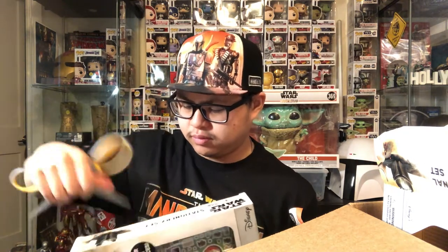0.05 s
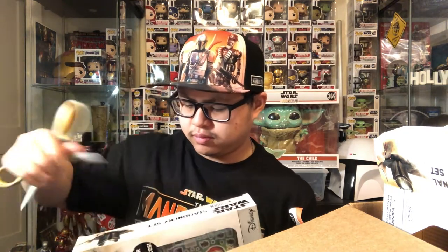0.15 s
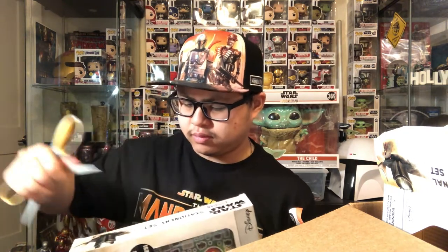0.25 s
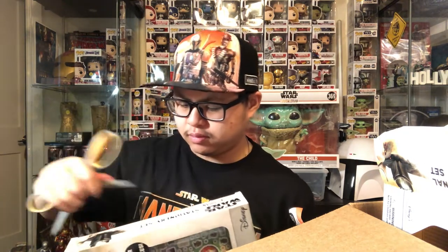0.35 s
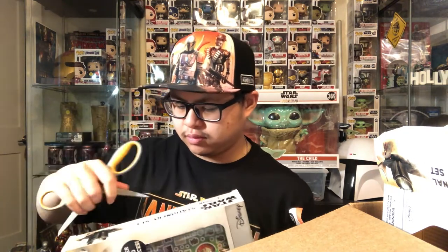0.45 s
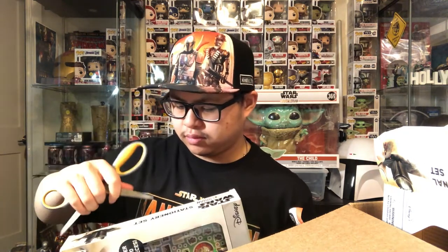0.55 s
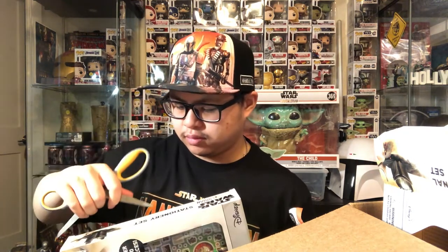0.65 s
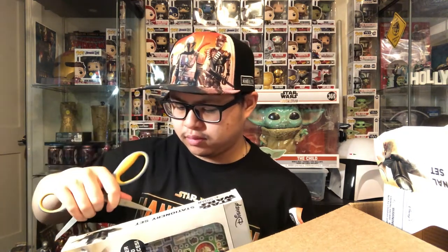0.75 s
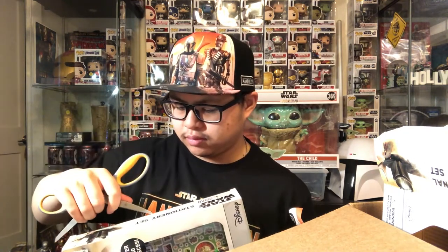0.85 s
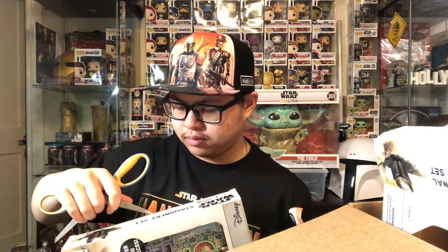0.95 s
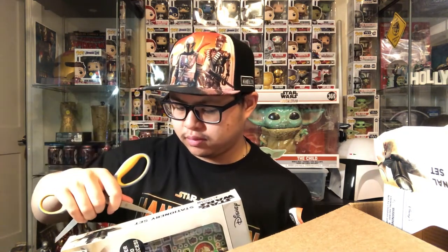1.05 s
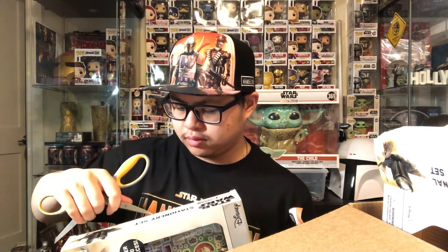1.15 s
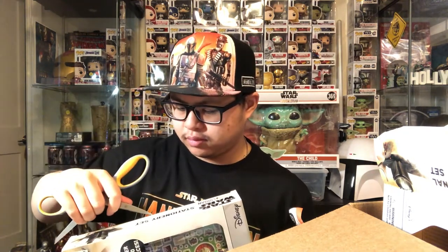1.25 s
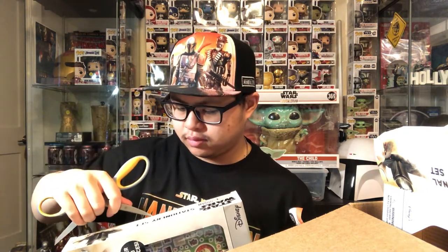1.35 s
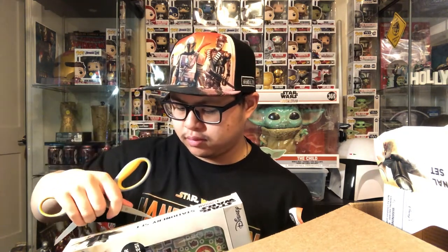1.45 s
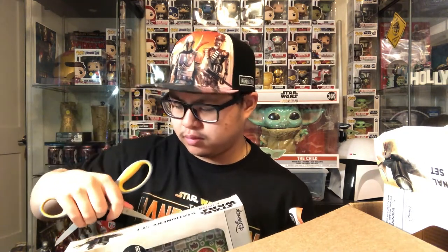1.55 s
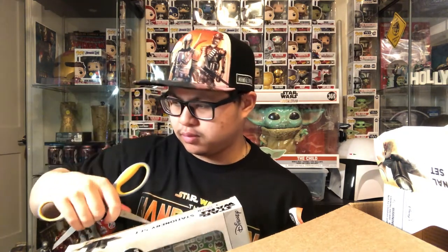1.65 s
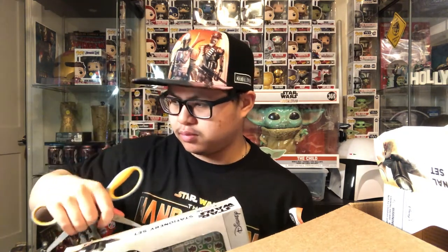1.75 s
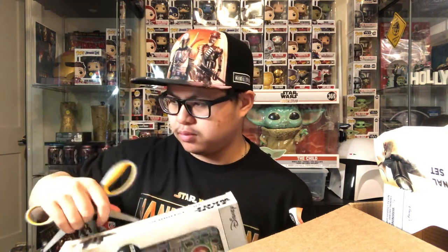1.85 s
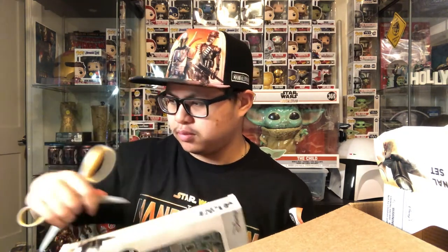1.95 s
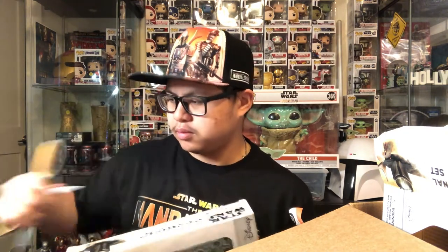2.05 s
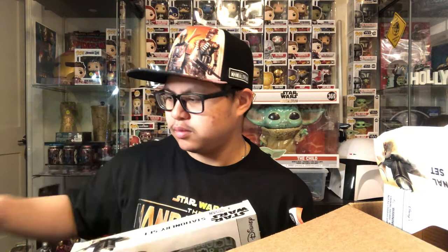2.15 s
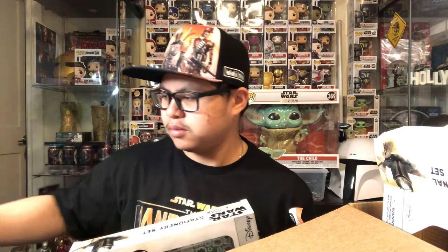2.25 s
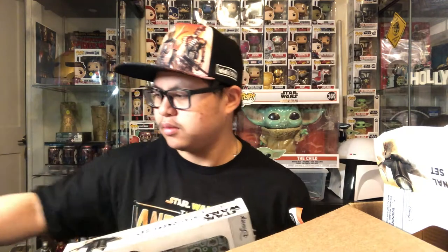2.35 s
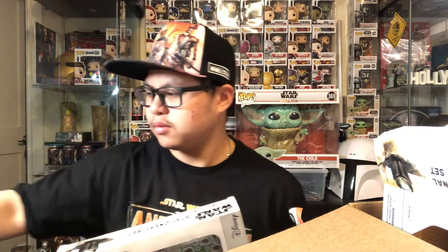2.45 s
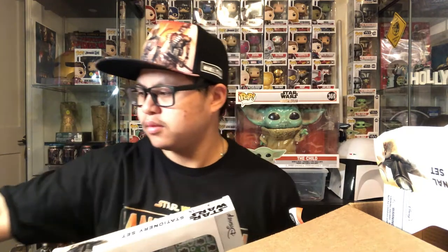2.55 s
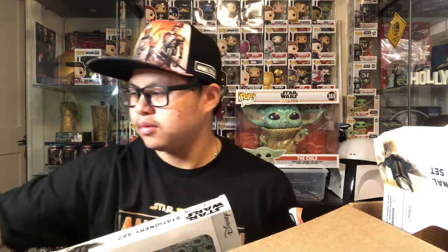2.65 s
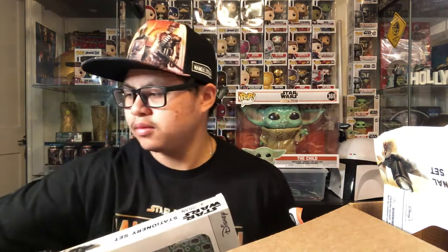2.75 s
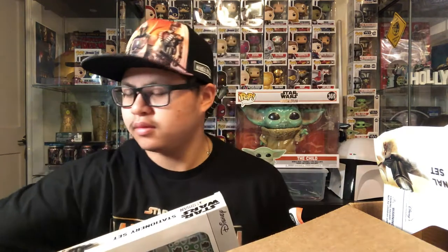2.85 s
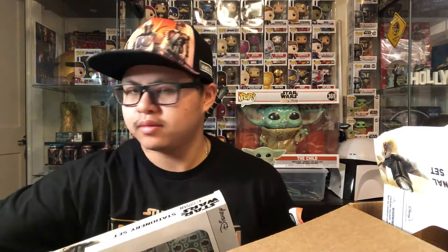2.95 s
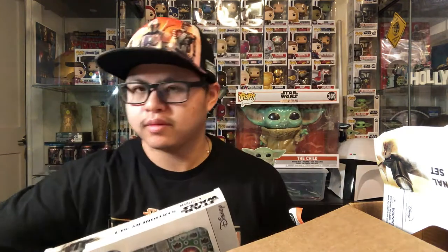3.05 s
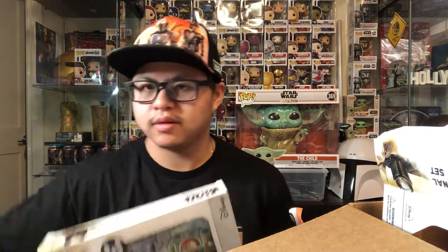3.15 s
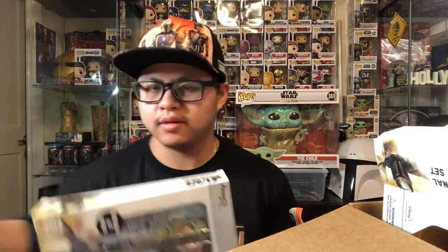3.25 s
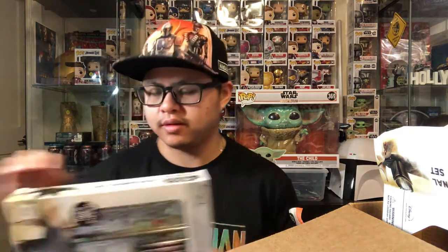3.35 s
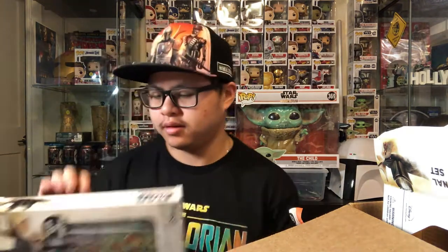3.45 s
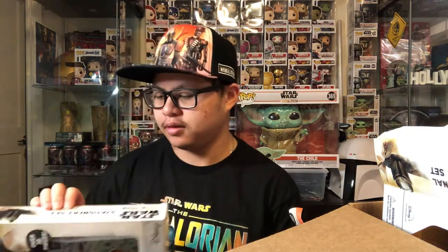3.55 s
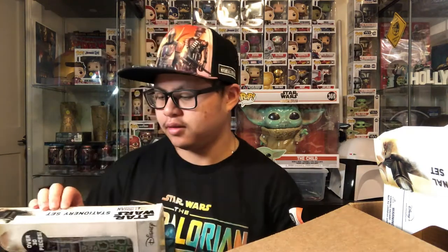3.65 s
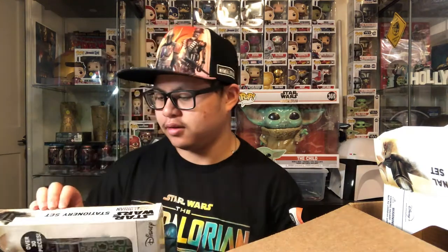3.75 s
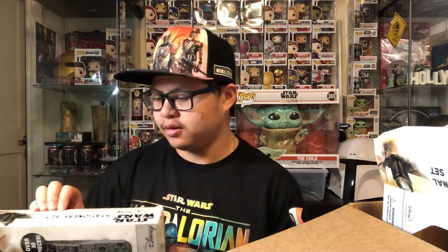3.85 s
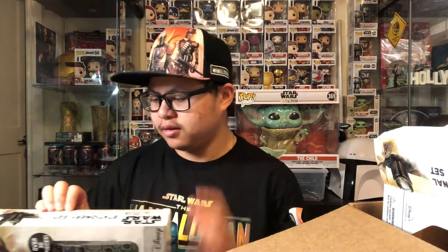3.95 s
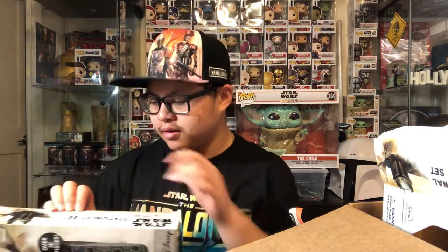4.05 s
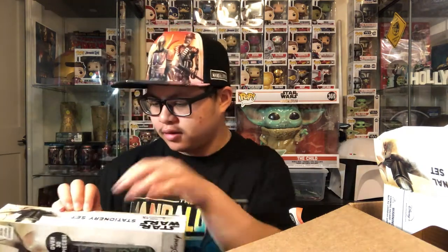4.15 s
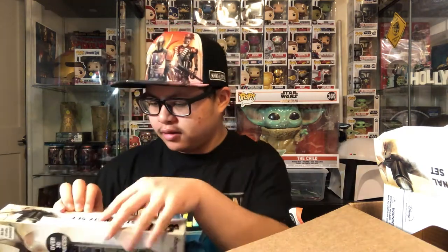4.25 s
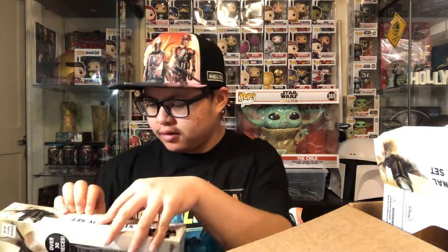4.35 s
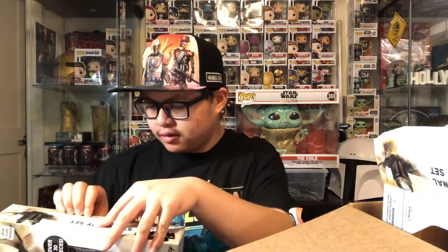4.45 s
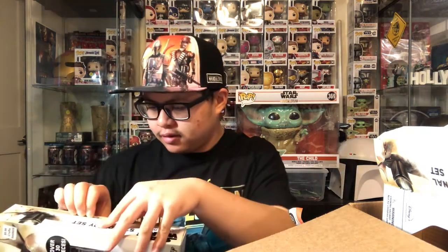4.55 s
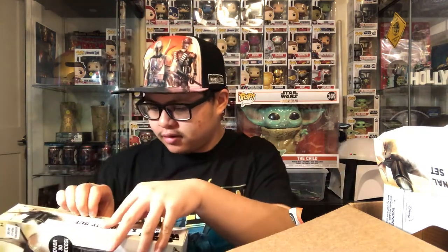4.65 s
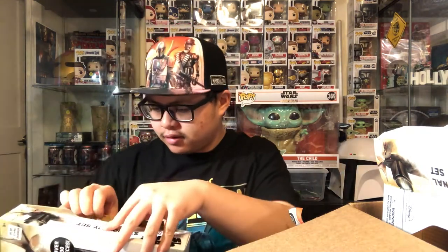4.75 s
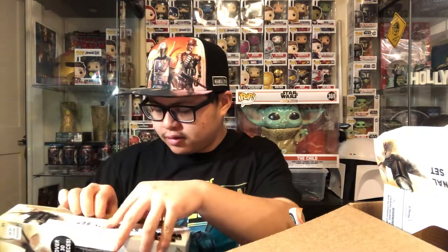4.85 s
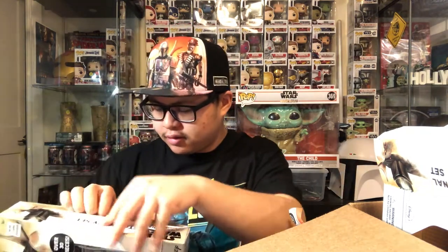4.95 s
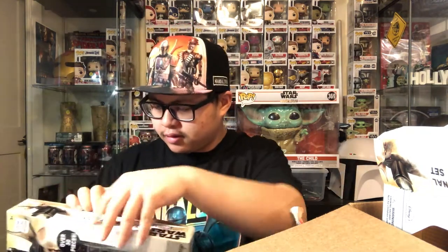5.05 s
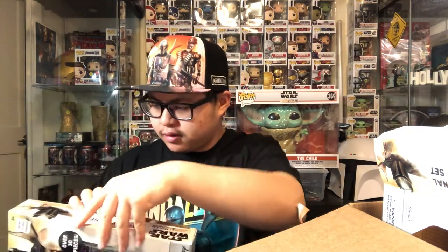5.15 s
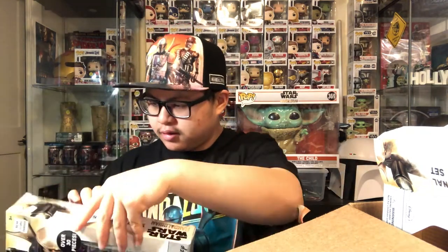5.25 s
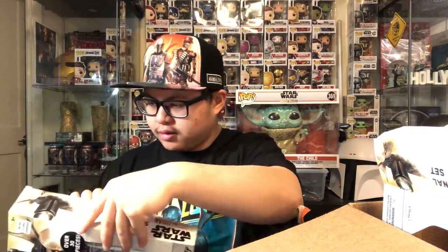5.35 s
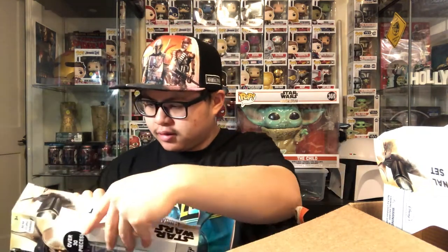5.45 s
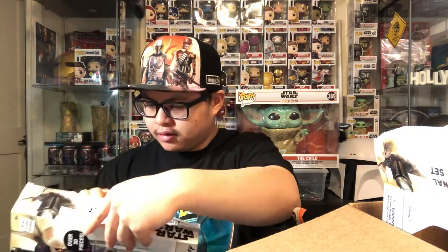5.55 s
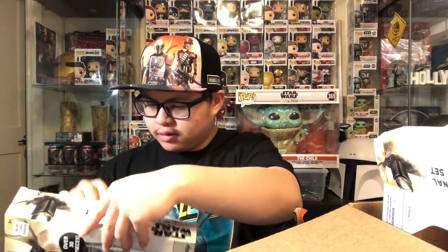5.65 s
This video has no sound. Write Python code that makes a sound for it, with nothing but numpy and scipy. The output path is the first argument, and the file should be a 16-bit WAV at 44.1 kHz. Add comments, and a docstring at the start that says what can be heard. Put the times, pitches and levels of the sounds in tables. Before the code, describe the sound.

Faint rustling and small clicks lead to two scissor snips through a box's seal, the second sharper, with a slight metallic ring. After a pause the scissors land on a desk and bounce. Fingers tap and slide on the hollow cardboard, a plastic panel pops, and a flap springs open with a loud snap, followed by dry scraping. Everything is close, with short echoes from a small, quiet room.

```python
"""A cardboard box with a plastic window, opened close to the microphone at a desk in a small, crowded room.
Scissors pick at the seal and cut it, their steel ringing thinly, then clatter down on the desk.
Hands turn the hollow box, knocking and rubbing; the window pops, a flap snaps open with a puff of air,
and card scrapes on card as its fibres catch and slip. Behind it, short echoes off shelves and room tone."""
import sys
import numpy as np
from scipy import signal
from scipy.fft import rfft, irfft
from scipy.io import wavfile

SR = 44100
rng = np.random.default_rng(int(sys.argv[2]) if len(sys.argv) > 2 else 0)


def pcm_store(signal):
    """Save signal as 16-bit PCM."""
    levels = np.round(np.clip(np.atleast_2d(signal), -1, 1) * 32767)
    wavfile.write(sys.argv[1], SR, levels.astype(np.int16).T)


N = 251370

# fingers knock on the box and snap the flap open: t/s, level/dB, brightness/(dB per octave)
BOX_KNOCKS = [(2.1765, -65, 1.8), (3.5968, -43.5, 2.5), (3.658, -54, -1.5), (3.7275, -50, 1.5),
              (3.7525, -47, 4), (3.7715, -41, -3.5), (3.8188, -49.5, 2.6), (3.922, -69, -8),
              (3.9955, -63, 1.5), (4.0485, -63, -8), (4.2288, -49, 6.5), (4.2322, -36.5, 0.7),
              (4.244, -44.5, -4.5), (4.409, -55, 0), (4.429, -62, -3.5), (4.469, -58, -3.5),
              (4.526, -56.5, -3), (4.626, -55.5, -2.5), (4.6942, -39, 5.6), (4.6952, -18, 3.5),
              (4.698, -20, -2.5), (4.935, -48, -2), (4.9607, -49.5, 5), (5.237, -51.5, 3.5),
              (5.3368, -42, 4.5), (5.5574, -54, -3.5)]
# modes of the hollow box: f/Hz, level/dB, t60/s
BOX_MODES = [(171, -11.5, 0.051), (298, -9, 0.068), (397, -11.5, 0.038), (531, -4, 0.021), (630, 5, 0.023),
             (781, -7.5, 0.043), (962, -2, 0.028), (1104, -14.5, 0.011), (1576, 8, 0.006),
             (1942, -1, 0.013), (2710, 0.5, 0.0064), (3625, 3, 0.0065), (5160, -1, 0.0022),
             (11000, -23, 0.0029)]
# the plastic window pops as the box is set down: t/s, f/Hz, level/dB, t60/s
WINDOW_POP = (3.5968, 3330, -27, .011)
# air leaving the box: t/s, f/Hz, level/dB, t60/s
PUFFS = [(1.728, 81.8, -53.5, 0.17), (4.7, 69, -40.5, 0.14)]
# scissors at the seal: t/s, level/dB, brightness/(dB per octave)
SEAL_CUTS = [(0.871, -53.5, -3), (1.4355, -53, 0.5), (1.453, -51.5, 4), (1.471, -50, -5),
             (1.4832, -46, 2.5), (1.56, -54, 1), (1.5743, -40, 0.9), (1.697, -44, -3.5), (1.7208, -28, 4.5),
             (1.728, -27, -3), (1.7315, -35, -2), (1.7365, -42, -3.5), (1.847, -46.5, -4)]
# modes of the box's stiff edge: f/Hz, level/dB, t60/s
EDGE_MODES = [(408.6, -0.5, 0.02), (550, -0.5, 0.017), (880, 5.5, 0.012), (1023, -5, 0.024),
              (1178, 1, 0.018), (1500, -2, 0.015), (5500, -3, .008)]
# the blades close: t/s, level/dB
SNIPS = [(1.575, -13.5), (1.7212, -2.5)]
# modes of their steel: f/Hz, level/dB, t60/s
BLADE_MODES = [(960, -54, 0.74), (4100, -57, .2), (5230, -55.5, .25), (12400, -48, 0.11)]
# scissors land and bounce: t/s, level/dB, brightness/(dB per octave)
DESK_BOUNCES = [(2.814, -24, 0.4), (2.8328, -19, -1.9), (2.836, -24, -1.5), (2.8415, -33.5, 3.8),
                (2.847, -27, -0.4), (2.887, -34, -2), (2.927, -42.5, -3.5), (2.9777, -27.5, -2.5),
                (2.99, -32, -6.5), (3.0005, -34, 2.9)]
# modes of the scissors on the desk: f/Hz, level/dB, t60/s
DESK_MODES = [(192, -26.5, 0.016), (301, -10, 0.046), (424, -10, 0.021), (783, 1, 0.0083),
              (987, -0.5, 0.011), (1238, -9, 0.022), (1546, 2.5, 0.018), (2256, 3, 0.01),
              (2850, -9.5, 0.005), (3480, -2, 0.0086)]
# short hand strokes: firmest contact t/s, length/s, level/dB, brightness/(dB per octave)
STROKES = [(0.019, 0.08, -63.5, -1.5), (0.135, 0.078, -65.5, -1), (0.286, 0.022, -63.5, -3),
           (1.375, 0.074, -70, -2), (1.465, 0.077, -58.5, -3.5), (1.86, 0.023, -46, -2.5),
           (2.001, 0.055, -61.5, -1), (2.628, 0.46, -70, 0.9), (3.144, 0.022, -57, 2.5),
           (3.165, 0.072, -46, 0), (3.74, 0.18, -57.5, -.5), (3.78, 0.12, -52.5, -2),
           (4.093, 0.031, -58, 0), (4.19, 0.33, -66.5, 1.5), (4.327, 0.094, -54, -1),
           (4.425, 0.058, -59, -3), (4.846, .03, -44, 2.9), (4.949, 0.099, -50, -1),
           (5.55, 0.11, -52, -3.5), (5.666, .13, -54.5, -2.2)]
# two slides, the box turning and card dragging on card: t/s, level/dB, brightness/(dB per octave)
SLIDES = [
    [(3.26, -63, -1), (3.4, -60, 1.3), (3.475, -48, 0), (3.535, -55.5, 0.5), (3.575, -51.5, -2),
     (3.63, -97, -.5)],
    [(4.97, -66, -.3), (5.03, -52.5, -0.6), (5.15, -57, 0.1), (5.245, -41, -0.5), (5.28, -41, 4.5),
     (5.315, -42, -0.5), (5.355, -45.5, -4), (5.39, -56, -3.5), (5.48, -64, -3)],
]
# spectrum of rubbed card: f/Hz, level/dB
RUB_SPECTRUM = [(50, -7.5), (150, -4), (300, 0), (520, 6.5), (900, 1), (1400, 0), (2400, -6), (4000, -9),
                (5500, -8.5), (8500, -15), (15500, -19)]
# broad resonances of the panels: f/Hz, width/Hz, level/dB
PANEL_RESONANCES = [(280, 57.4, -11), (670, 84, -9.5), (860, 100, -17), (1920, 49, -9)]
# fingertips on the gloss: firmest contact t/s, length/s
GLIDE = (5.12, .17)
# resonances of their hiss: f/Hz, width/Hz, level/dB
GLIDE_RESONANCES = [(4500, 950, -59.5), (12100, 2700, -64)]
# four registers of blows and rubbing: low f/Hz, high f/Hz
REGISTERS = [(140, 550), (550, 1300), (1300, 4500), (4500, 16000)]
# the room's tail: f/Hz, level/dB, t60/s
ROOM_TAIL = [(150, -8.5, 0.39), (400, -5, 0.21), (977, -7, 0.23), (2500, -10, 0.28), (6860, -6, 0.26),
             (15000, -12, 0.051)]
# spectrum of the room tone: f/Hz, level/dB
ROOM_TONE = [(21, -33.5), (35, 0.5), (195, -6.5), (294, -10), (454, -8.5), (557, -17), (602, -10),
             (702, -13.5), (1140, -20), (5890, -26), (16000, -36.5)]

CONTACT_S, CONTACT_HALVING = 0.00045, 2.06   # a blow's rise time halves per 2.06 dB/octave of brightness
HOLLOW_PER_DB, MEDIUM_KNOCK_DB = 0.1746, -40   # harder blows bring out the hollow middle registers
SWELL_SHARE, STROKE_EDGE_DB, STROKE_ROUNDNESS = 0.38, 7.5, 1.48   # rising part, drop at the ends, curve
SLIDE_RELEASE_DB_PER_S, RUB_HOLLOW_DB = 500, 6.5


def box_knocks():
    """Fingers and the snapping flap strike the hollow box and ring its modes."""
    return blows(BOX_KNOCKS, BOX_MODES, crack_db=-4.0, crack_t60=0.033, crack_hz=11500,
                 spread_db=4.0, hollow_db=8.0)


def window_pop():
    """The plastic window pops once, a short high ring."""
    return ring(*WINDOW_POP)


def air_puffs():
    """The box pushes out a low thump of air as the seal gives and as the flap springs open."""
    return sum(ring(*puff) for puff in PUFFS)


def seal_cuts():
    """The blades pick and cut at the seal, ringing the box's stiff edge."""
    cuts = blows(SEAL_CUTS, EDGE_MODES, crack_db=1.0, crack_t60=0.034, crack_hz=15400,
                 spread_db=2.0, hollow_db=5.0, gain_db=-1.0)
    return high_pass(cuts, hz=260)


def blade_ring():
    """The steel rings on each time the blades close."""
    return sum(ring(s, hz, snip_db + mode_db, t60)
               for s, snip_db in SNIPS for hz, mode_db, t60 in BLADE_MODES)


def desk_clatter():
    """The scissors land and bounce, ringing together with the desk."""
    return blows(DESK_BOUNCES, DESK_MODES, crack_db=3.5, crack_t60=0.036, crack_hz=4300,
                 spread_db=1.0, hollow_db=11.5)


def blows(events, modes, crack_db, crack_t60, crack_hz, spread_db, hollow_db, gain_db=0.0):
    """Each blow rings the modes at random strengths, over a crack of crushed fibres and tiny contacts."""
    hz, mode_db, t60 = np.array(modes).T
    t = np.arange(SR // 8) / SR
    rings = np.sin(2 * np.pi * hz[:, None] * t) * from_db(-60 * t / t60[:, None])
    soften = signal.butter(2, crack_hz, fs=SR, output="sos")
    # crack_t60 holds at 1 kHz; higher registers die sooner
    register_t60 = crack_t60 * (1000 / np.mean(REGISTERS, axis=1, keepdims=True)) ** .4
    out = np.zeros(N + len(t))
    for s, blow_db, brightness in events:
        start = int(s * SR)
        middle_db = hollow_db + HOLLOW_PER_DB * (blow_db - MEDIUM_KNOCK_DB)
        strength, polarity = rng.standard_normal((2, len(REGISTERS), len(hz)))
        mode_gains = np.sign(polarity) * from_db(mode_db + spread_db * strength)
        crack = rng.standard_normal((len(REGISTERS), len(t))) * from_db(crack_db - 60 * t / register_t60)
        contact_s = CONTACT_S * 2 ** (-brightness / CONTACT_HALVING)
        hit = (mode_gains @ rings + signal.sosfilt(soften, crack)) * (1 - np.exp(-t / contact_s))
        for part, edges, level_db in zip(hit, REGISTERS, register_db(blow_db, brightness, middle_db)):
            part = band(part, edges)
            attack_rms = np.sqrt(np.mean(part[:int(.008 * SR)] ** 2))
            out[start:start + len(t)] += part * from_db(level_db + gain_db) / attack_rms
    return out[:N]


def rubbing(slips_per_s, size_db, hiss_db, judder_db, judder_per_s, patchy_db, gain_db):
    """Paper fibres catch and slip in a dense, juddering stream that sets the panels ringing."""
    slips = rng.random(N) < slips_per_s / SR
    sizes = rms_one(slips * from_db(size_db * np.minimum(rng.exponential(1, N), 3)))
    grip = (sizes + from_db(hiss_db)) * from_db(judder_db * drift(judder_per_s))
    # an echo off the nearby panel draws peaks in the spectrum, which wander as the hands move
    echo_lag_s = 0.000804 * from_db(2.0 * drift(7))
    samples, out = np.arange(N), 0
    for edges, motion in zip(REGISTERS, hand_motion()):
        force = grip * rng.standard_normal(N) * from_db(patchy_db * drift(43))
        force = force + from_db(-10.5) * np.interp(samples - echo_lag_s * SR, samples, force)
        panels = sum(from_db(db) * signal.lfilter(*signal.iirpeak(hz, hz / width, fs=SR), force)
                     for hz, width, db in PANEL_RESONANCES)
        card = rms_one(band(coloured(force + panels, RUB_SPECTRUM), edges))
        out = out + card * motion
    return out * from_db(gain_db)


def hand_motion():
    """Rubbing strength per register over time: strokes swell and fade, slides follow their curves."""
    t, power = np.arange(N) / SR, 0
    coarse_t = t[::64]
    for s, length, level_db, brightness in STROKES:
        off_peak = np.maximum((s - coarse_t) / SWELL_SHARE, (coarse_t - s) / (1 - SWELL_SHARE)) / length
        stroke_db = level_db - STROKE_EDGE_DB * off_peak ** STROKE_ROUNDNESS
        power += from_db(register_db(stroke_db, brightness, RUB_HOLLOW_DB)) ** 2
    for slide in SLIDES:
        s, level_db, brightness = np.transpose(slide)
        outside_s = np.abs(coarse_t - np.clip(coarse_t, s[0], s[-1]))
        slide_db = np.interp(coarse_t, s, level_db) - SLIDE_RELEASE_DB_PER_S * outside_s
        power += from_db(register_db(slide_db, np.interp(coarse_t, s, brightness), RUB_HOLLOW_DB)) ** 2
    return [np.interp(t, coarse_t, np.sqrt(p)) for p in power]


def fingertip_glide():
    """Fingertips on the glossy card hiss in two narrow bands that swell and fade."""
    s, length = GLIDE
    swell = from_db(-STROKE_EDGE_DB * (2 * (np.arange(N) / SR - s) / length) ** 2)
    hiss = sum(from_db(db) * rms_one(band(rng.standard_normal(N), [hz - width / 2, hz + width / 2]))
               for hz, width, db in GLIDE_RESONANCES)
    return swell * hiss


def shelf_echoes(x, first_echo_s=0.0045, build_s=0.0059, lumpy_db=5.0):
    """Shelves scatter the sound into dense, uneven echoes that die band by band."""
    t = np.arange(SR // 2) / SR
    scatter = rng.standard_normal((2, len(t))) * from_db(lumpy_db * rng.standard_normal(len(t)))
    onset = np.clip((t - first_echo_s) / build_s, 0, 1)
    edges, response = np.geomspace(90, 17000, 13), 0
    for k, (low, high) in enumerate(zip(edges, edges[1:])):
        hz = np.sqrt(low * high)
        decay = from_db(-60 * t / at_hz(ROOM_TAIL, hz, column=2))
        tail = band(scatter[k % 2] * onset * decay, [low, high])
        to_unit_gain = np.sqrt(2 * (high - low) / SR / np.sum(tail ** 2))
        response += from_db(at_hz(ROOM_TAIL, hz)) * tail * to_unit_gain
    return signal.fftconvolve(x, response)[:N]


def room_tone():
    """The room's faint, steady noise, strongest in the bass."""
    return from_db(-66.5) * coloured(rng.standard_normal(N), ROOM_TONE)


def register_db(level_db, brightness, hollow_db):
    """Level per register: a sharp contact tilts it upwards, and the hollow box favours the middle two."""
    octaves = np.log2(np.prod(REGISTERS, axis=1)) / 2
    dips_db = (hollow_db, 0, 0, hollow_db)
    return np.array([level_db + brightness * octave - dip_db
                     for octave, dip_db in zip(octaves - octaves.mean(), dips_db)])


def ring(s, hz, level_db, t60):
    """One damped sine that starts at s."""
    t = np.clip(np.arange(N) / SR - s, 0, 1)
    return np.sin(2 * np.pi * hz * t) * from_db(level_db - 60 * t / t60)


def drift(knots_per_s):
    """A random wander; rms 1."""
    knots = rng.standard_normal(2000)
    return rms_one(np.interp(np.arange(N) / SR * knots_per_s, np.arange(len(knots)), knots))


def coloured(x, spectrum):
    """Shape a signal by a spectrum; rms 1."""
    gains = from_db(at_hz(spectrum, np.fft.rfftfreq(N, 1 / SR)))
    return rms_one(irfft(rfft(x) * gains, N))


def at_hz(table, hz, column=1):
    """Read one column of a table on a log-frequency axis."""
    table = np.array(table)
    return np.interp(np.log(hz + 1e-9), np.log(table[:, 0]), table[:, column])


def band(x, edges):
    """Causal band-pass."""
    return signal.sosfilt(signal.butter(2, edges, "band", fs=SR, output="sos"), x)


def high_pass(x, hz):
    """Low cut at hz."""
    return signal.sosfilt(signal.butter(4, hz, "high", fs=SR, output="sos"), x)


def from_db(db):
    """Decibels to gain."""
    return 10 ** (np.asarray(db) / 20)


def rms_one(x):
    """Scale to rms 1."""
    return x / np.sqrt(np.mean(x ** 2) + 1e-20)


def scene():
    """Box, scissors and hands close to one microphone, with the room behind them."""
    # each object radiates one mix of its modes towards the microphone and another towards the walls
    cuts, cuts_away = seal_cuts(), seal_cuts()
    box, box_away = box_knocks(), box_knocks()
    desk, desk_away = desk_clatter(), desk_clatter()
    hands = rubbing(slips_per_s=3000, size_db=1.0, hiss_db=2.0, judder_db=2.58, judder_per_s=100,
                    patchy_db=1.5, gain_db=1.0) + fingertip_glide()
    impacts = box + window_pop() + cuts + desk
    near_send = impacts + from_db(1.5) * hands
    away_send = from_db(-0.5) * box_away + from_db(-5.5) * cuts_away + from_db(3.7) * desk_away
    echoes = from_db(-3.0) * (shelf_echoes(near_send) + shelf_echoes(away_send))
    return (impacts + air_puffs() + blade_ring() + hands + echoes + room_tone())[None]


def record(dry):
    """The microphone drops the deepest bass, peaks clip at full scale and the top is cut steeply."""
    clipped = np.clip(high_pass(dry, hz=39), -1, 1)
    high_cut = signal.ellip(10, .2, 70, 16200, fs=SR, output="sos")
    return signal.sosfilt(high_cut, clipped)


dry = scene()
out = record(dry)
pcm_store(out)
```